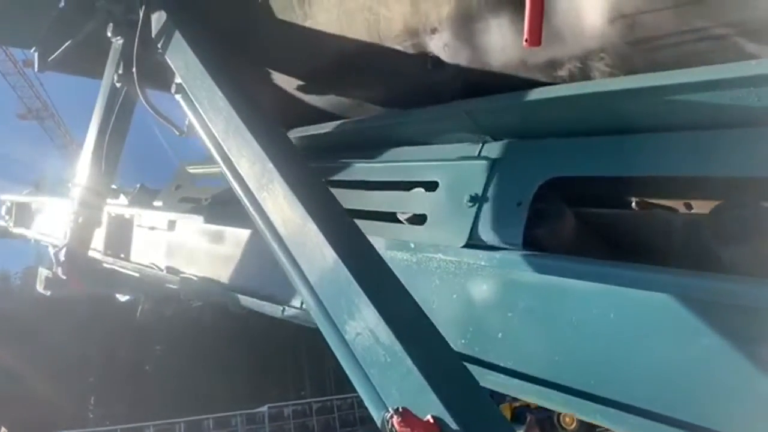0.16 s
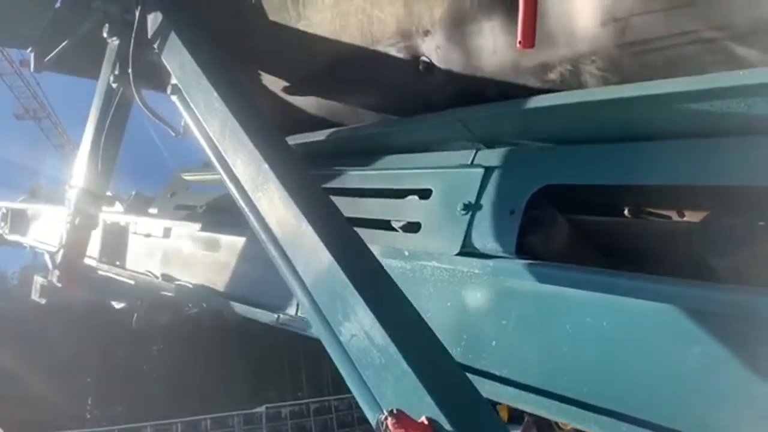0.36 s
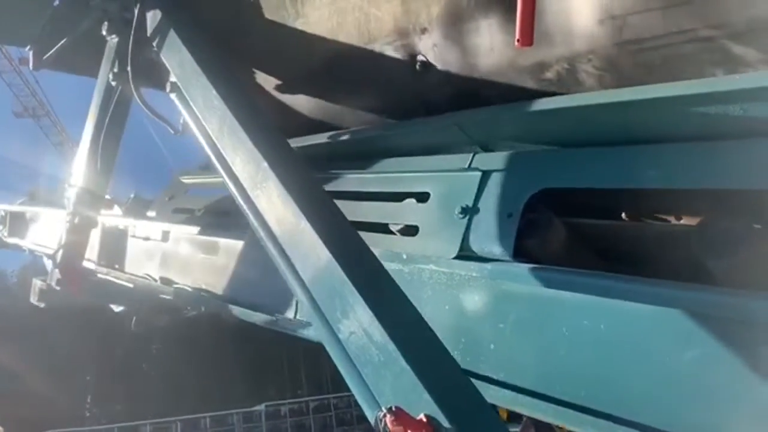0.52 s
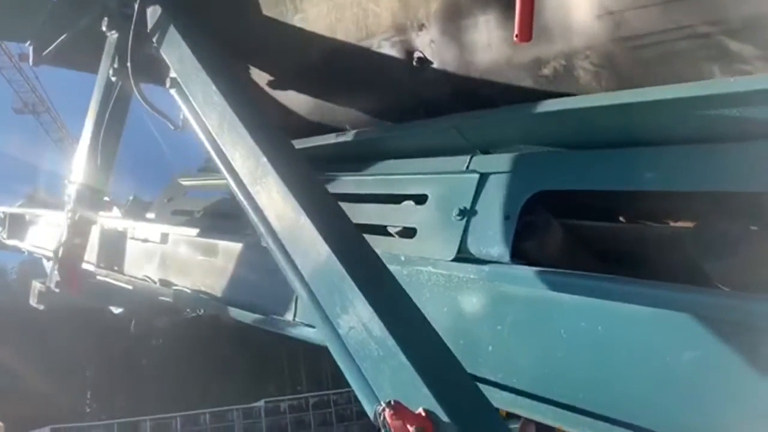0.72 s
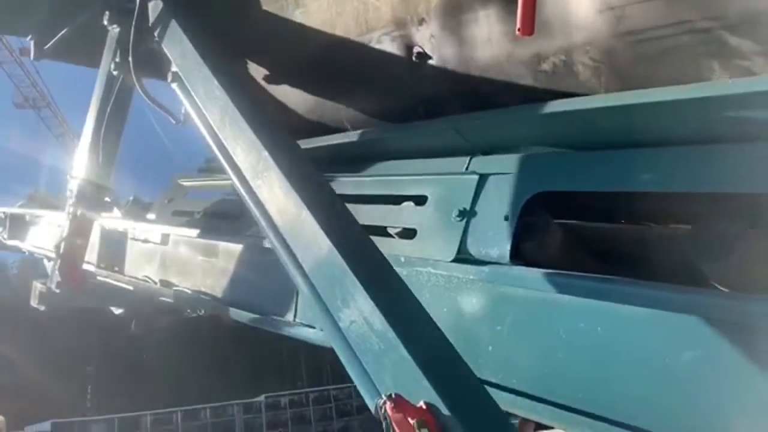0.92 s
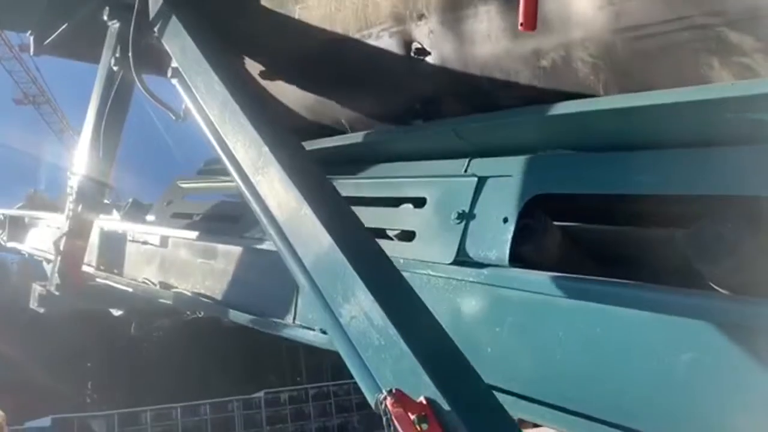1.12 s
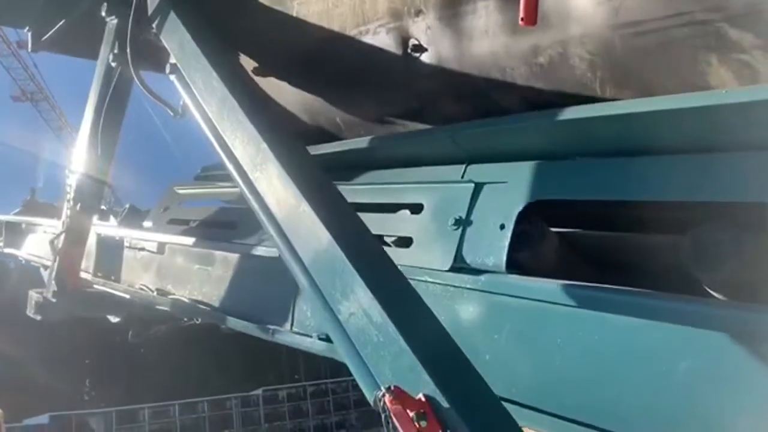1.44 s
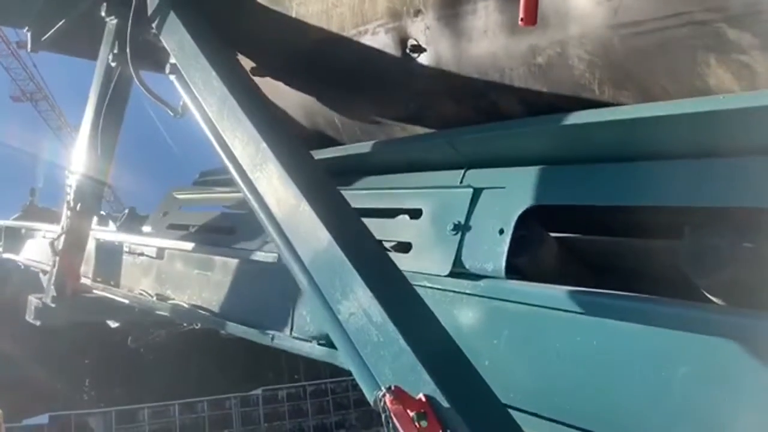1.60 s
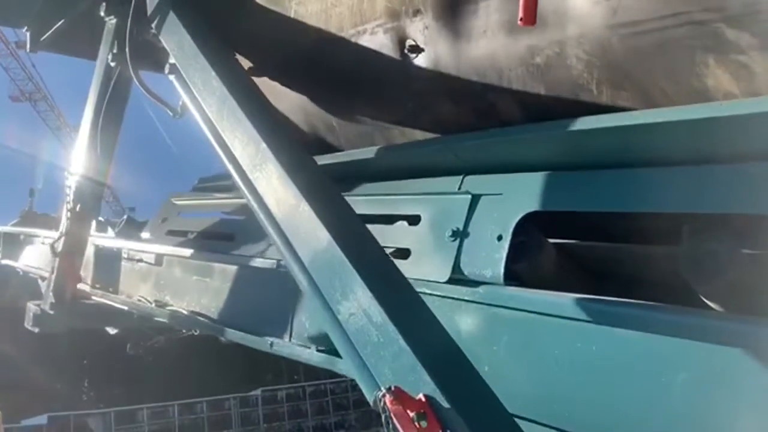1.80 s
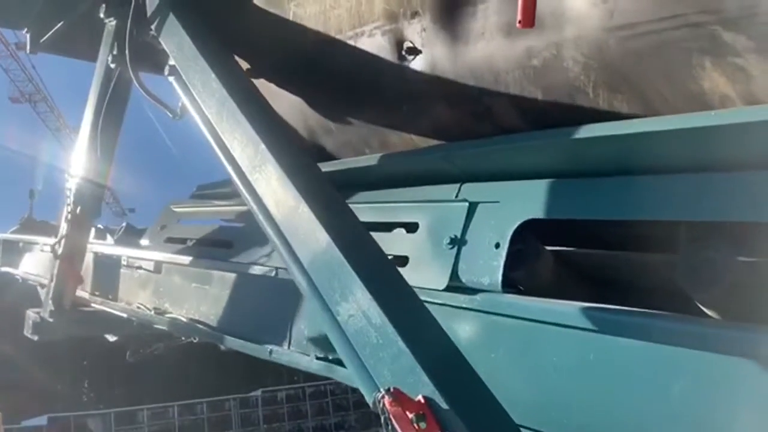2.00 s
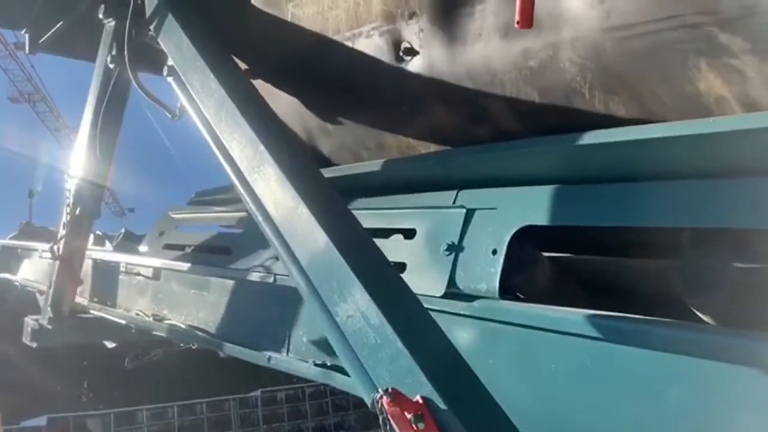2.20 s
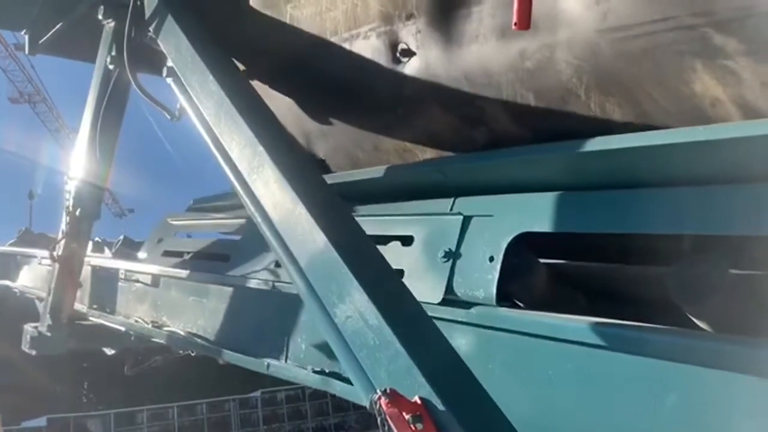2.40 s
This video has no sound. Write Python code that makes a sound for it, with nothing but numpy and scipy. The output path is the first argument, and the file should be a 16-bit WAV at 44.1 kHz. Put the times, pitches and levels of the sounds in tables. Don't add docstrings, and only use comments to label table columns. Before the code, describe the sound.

Large diesel screening machine drones steadily nearby outdoors, stones rattling, with one short bouncing metal clank

```python
import sys
import numpy as np
from scipy import signal
from scipy.io import wavfile
from scipy.ndimage import uniform_filter1d

SR = 44100
rng = np.random.default_rng(int(sys.argv[2]) if len(sys.argv) > 2 else 0)


def pcm_store(signal):
    levels = np.round(np.clip(np.atleast_2d(signal), -1, 1) * 32767)
    wavfile.write(sys.argv[1], SR, levels.astype(np.int16).T)


def convert_level_to_amplitude(level_db):
    exponent = np.asarray(level_db, float) / 20
    return 10 ** exponent


N = 112455
CYCLE_HZ = 19.9012


def evened(x):
    return x / np.sqrt(np.mean(x ** 2) + 1e-20)


def along(curve):
    return np.interp(np.arange(N) / SR, *np.transpose(curve))


def read(points, hz, axis=1):
    rows = np.array(points)
    return np.interp(np.log(hz + 1), np.log(rows[:, 0] + 1), rows[:, axis])


def drift(per_s, count):
    t = np.arange(0, N + 256, 256) / SR
    f = per_s * np.geomspace(.08, 1, 12)[:, None]
    phase = rng.random((count, 12, 1))
    rows = (np.sin(2 * np.pi * (f * t + phase)) / np.sqrt(f)).sum(1)
    return np.array([np.interp(np.arange(N) / SR, t, evened(row)) for row in rows])


def panned(pan_db):
    return convert_level_to_amplitude(np.array([[pan_db / 2], [-pan_db / 2]]))


def add(mix, s, sound):
    part = mix[:, round(s * SR):][:, :sound.shape[1]]
    part += sound[:, :part.shape[1]]


# frequency in Hz, phase the left port leads by in radians.
PORT_PHASE = [(0, 0), (1210, -2.8), (1810, 0), (2300, -2.4), (4650, -6.3), (5400, -9.4), (6600, -12.6),
              (11000, -15.9)]


def lead(hz):
    return np.exp(-1j * np.interp(hz, *np.transpose(PORT_PHASE)))


# order of
# the engine cycle, level in dB rms, left-right difference in dB.
ENGINE_ORDERS = [(2, -46, 0), (3, -44, 0), (4, -19, 0), (5, -45, 0), (6, -51, 3), (7, -49, 2), (8, -27, 1),
                 (9, -41, 4), (10, -33, 2), (11, -43, 4), (12, -43, 1), (14, -44, 0), (16, -47, 3),
                 (19, -45, -2), (20, -38, -7), (21, -47, -12), (22, -48, -14), (23, -41, -4),
                 (24, -40, -7), (25, -42, -4), (26, -43, -4), (27, -46, 6), (28, -47, 1), (30, -43, -4),
                 (35, -49, -5), (37, -48, 1), (39, -50, -10), (40, -46, -7), (43, -48, -12), (44, -44, -2),
                (51, -51, -12), (52, -47, -10), (53, -51, -6), (57, -49, -6), (58, -46, -3), (59, -45, -5),
                (60, -48, 1), (62, -49, -2), (73, -47, -6), (76, -51, 8)]
# time in seconds, level of the whole engine in dB.
ENGINE_LOAD = [(0, 0.5), (.09, -2), (.2, 0.5), (.7, -0.5), (.79, -1.5), (1, 0.5), (1.1, 0.5), (1.65, -.5),
               (1.8, 0.5), (2, 0), (2.15, 0.4), (2.55, 0)]


def engine():
    first_firing_s, pipe_lag_s, left_lag_s = .0026, .0015, .0004
    waver_db, waver_rad, waver_per_s = 2.0, .4, 6
    t = np.arange(N) / SR - first_firing_s
    orders = ENGINE_ORDERS + valves()
    wander = drift(waver_per_s, count=2 * len(orders))
    start = rng.uniform(0, 2 * np.pi, len(orders))
    out = np.zeros((2, N))
    for i, (order, db, pan_db) in enumerate(orders):
        hz = order * CYCLE_HZ
        loose = min(order / 20, 3)
        offset = start[i]
        if order in (4, 8, 10):
            offset = np.pi + 2 * np.pi * (order - 4) * CYCLE_HZ * pipe_lag_s
        lag = np.array([[left_lag_s * min(loose, 1) ** 2], [0]])
        turn = 2 * np.pi * hz * (t - lag) + offset + waver_rad * loose * wander[2 * i]
        level = convert_level_to_amplitude(db + waver_db * loose * wander[2 * i + 1])
        out += np.sqrt(2) * panned(pan_db) * level * np.cos(turn)
    return out * convert_level_to_amplitude(along(ENGINE_LOAD))


def valves():
    order = np.arange(104, 180, 2) + rng.integers(0, 2, 38)
    strength, side = rng.standard_normal((38, 2)).T
    db = -62.5 - 10.5 * np.log2(order / 100) + 3.5 * strength
    return list(zip(order, db, 4 * (1 + side)))


def fuzzy(hz, width, alike):
    r = np.exp(-2 * np.pi * width / SR)
    z = rng.standard_normal((2, N + 8000, 2)) @ [1, 1j]
    z = signal.lfilter([1], np.convolve([1, -r], [1, -r]), z)[:, 8000:]
    shift = lead(hz) if hz < 9000 else .6
    z[1] = alike * z[0] * shift + np.sqrt(1 - alike ** 2) * z[1]
    return evened((z * np.exp(2j * np.pi * hz * np.arange(N) / SR)).real)


# time in seconds, whine level in dB, level of its shaft sideband in dB.
PUMP_LEVELS = [(0, -33, -46), (.05, -29.5, -44), (.3, -28.5, -39), (.55, -32, -38), (.8, -37, -41),
               (.95, -37, -42), (1.12, -35, -40), (1.22, -44, -44), (1.42, -46, -43), (1.55, -39, -38),
               (1.8, -37, -37), (2.1, -36, -38), (2.3, -34, -39), (2.55, -29.5, -38)]
# frequency in Hz, width in Hz, level in dB rms, left-right difference in dB.
GEAR_WHINES = [(1487, 9, -42, 3), (1752, 14, -45, 1), (1611, 4, -50, 3)]
# frequency in Hz,
# width in Hz, level in dB rms, left-right difference in dB.
NARROW_BANDS = [(368, 25, -43.5, -7.5), (737, 20, -47.5, -9.5), (1173, 40, -39.5, -8), (1476, 69, -39, 8),
                (6620, 260, -55.5, 0), (3500, 89, -54.5, 5.5), (12240, 330, -71.5, -2),
                (12800, 200, -79, 2.5), (6040, 30, -58.5, 1)]


def hydraulics():
    pump_hz, shaft_hz, beat_top_s, beat_slip_rad = 1751.4, 16.5, 1.814, .25
    t = np.arange(N) / SR
    s, main_db, side_db = np.transpose(PUMP_LEVELS)
    out = np.zeros((2, N))
    shared = .5 * drift(6.47, count=1)
    port_phase = np.array([[1.4], [0]])
    for hz, db in ((pump_hz, main_db), (pump_hz - shaft_hz, side_db)):
        slip = beat_slip_rad * drift(4.27, count=1)
        turn = 2 * np.pi * hz * (t - beat_top_s) + shared + slip + port_phase
        level = convert_level_to_amplitude(np.interp(t, s, db) + drift(5.08, count=2))
        out += np.sqrt(2) * np.cos(turn) * level * panned(3.5)
    for rows, alike in ((GEAR_WHINES, .94), (NARROW_BANDS, .71)):
        for hz, width, db, pan_db in rows:
            out += convert_level_to_amplitude(db) * panned(pan_db) * fuzzy(hz, width, alike)
    return out


# start in seconds, level in dB, wall pitch in Hz.
HOPPER_LUMPS = [(.055, -29, 365.7), (0.331, -32.5, 364), (.42, -31, 378.5), (0.53, -42, 360),
                (.65, -27, 368), (.834, -35, 363), (.99, -28.5, 380), (1.06, -27, 373.4),
                (1.13, -30.5, 348), (1.26, -31.5, 365), (1.51, -31.5, 372.3), (1.631, -38, 360),
                (1.752, -30.5, 367), (1.839, -31.5, 364.4), (1.971, -34.5, 369), (2.073, -32, 353),
                (2.12, -28.5, 395), (2.195, -24, 368), (2.44, -26.5, 368), (2.51, -30, 385)]


def hopper():
    rise_s, t60_s, split = .022, .33, .98
    out, t = np.zeros((2, N)), np.arange(16000) / SR
    for (s, db, hz), share in zip(HOPPER_LUMPS, rng.random((len(HOPPER_LUMPS), 1))):
        wall = np.exp(2j * np.pi * hz * t) + .5 * share * np.exp(2j * np.pi * split * hz * t)
        shape = (1 - np.exp(-t / rise_s)) * convert_level_to_amplitude(db + 8.5 - 60 * t / t60_s)
        add(out, s, panned(-4) * shape * np.array([wall, wall * lead(hz)]).real)
    return out


# time in seconds, load in dB.
DECK_LOAD = [(0, 0), (.5, 1.5), (1, 0.5), (1.5, 0.5), (2, 0.5), (2.2, 2.5), (2.55, 3)]
# start in seconds, level in dB, pitch in Hz.
STONE_HITS = [(.2224, -42.5, 3800), (.24, -44, 3700), (.27, -47.5, 5000), (.3, -47, 6300),
              (.335, -49, 3750), (.355, -49, 3740), (.3995, -58, 6400), (.4294, -47, 3500),
              (.4574, -51, 3400), (.5062, -47, 3500), (.545, -46, 4220), (.5561, -46, 3900),
              (.6005, -47, 3500), (.7247, -44, 3170), (.745, -52, 3600), (.8724, -51, 3240),
              (.9123, -48, 3500), (.9682, -42, 3410), (.97, -47, 2680), (1.005, -52, 3800),
              (1.064, -49, 3830), (1.1298, -42, 4160), (1.145, -46, 4480), (1.158, -42.5, 3900),
              (1.215, -44, 2820), (1.245, -51, 4700), (1.275, -43, 4080), (1.3059, -43, 4010),
              (1.33, -47, 4240), (1.352, -52, 4200), (1.482, -48, 3500), (1.4995, -52, 4000),
              (1.5474, -51, 4630), (1.715, -50, 6450), (1.765, -46, 6600), (1.8726, -53, 6900),
              (1.8921, -48, 3250), (2.0053, -43, 5000), (2.05, -50, 4150), (2.09, -48, 3670),
              (2.14, -53, 2630), (2.152, -44, 4050), (2.158, -42.5, 6200), (2.24, -47, 7060),
              (2.2635, -46, 3900), (2.39, -49, 4620), (2.4194, -49, 3680), (2.44, -46, 4800),
              (2.46, -43.5, 4900), (2.5062, -46, 3700), (2.53, -48, 4200)]


def stones():
    t60_s, rise_s, pitch_spread = .13, .0046, .2
    rattle_per_s, rattle_db, rattle_size_db, rattle_load = 94, -46, 1.5, 1.5
    out, t = np.zeros((2, N)), np.arange(3000) / SR
    moment, size, pitch, side = rng.random((240, 4)).T
    when = moment * 240 / rattle_per_s
    size_db = rattle_db - rattle_size_db * np.log(size + .05)
    size_db += rattle_load * np.interp(when, *np.transpose(DECK_LOAD))
    rattle = zip(when, size_db, 2000 * 3.6 ** pitch, 8 * side - 3)
    large = [(*row, 3) for row in STONE_HITS]
    for patches, rows in ((20, large), (2, rattle)):
        for s, db, hz, pan_db in rows:
            spread = 1 + pitch_spread * rng.uniform(-1, 1, (2, patches, 1))
            if s < N / SR:
                mesh = np.sin(2 * np.pi * hz * spread * (t + 1)).sum(1)
                shape = np.minimum(t / rise_s, 1) * convert_level_to_amplitude(db - 60 * t / t60_s)
                add(out, s, panned(pan_db) * mesh * shape)
    return out


def ring(modes, t):
    tones = sum(convert_level_to_amplitude(db - 60 * t / t60) * np.sin(2 * np.pi * hz * t) for hz, db, t60 in modes)
    return np.minimum(t / .00092, 1) * tones


# start in seconds, level in dB.
CLANK_BLOWS = [
    (2.1455, 0),
    (2.2074, -1),
    (2.2628, -2),
    (2.3211, -2),
    (2.3675, -5),
]
# frequency in Hz, level in dB, 60 dB decay in seconds.
PLATE_MODES = [(2595, -38, .1), (3680, -41, .2), (4587, -42, .3), (5647, -44, .1), (5916, -39, .14),
               (6740, -45, .08), (1900, -38, .1)]
# frequency in Hz, level in dB, 60 dB decay in seconds.
RAIL_MODES = [(3985, -37, .22), (4560, -47, .2), (5087, -47, .16), (6980, -46, .08), (8225, -52, .35)]


def clank():
    out, t = np.zeros((2, N)), np.arange(16000) / SR
    for i, (s, db) in enumerate(CLANK_BLOWS):
        struck = RAIL_MODES if i else PLATE_MODES
        modes = [(hz, mode_db + db + 3 * rng.uniform(-.52, 1), t60) for hz, mode_db, t60 in struck]
        add(out, s, panned(1) * ring(modes, t))
    return out


# frequency
# in Hz, left level in dB per Hz, right level in dB per Hz.
NOISE_SPECTRUM = [(18, -68, -66), (40, -65.5, -50), (99, -50.5, -56.5), (234, -54, -55.5), (265, -50, -66),
                  (313, -56.5, -57.5),
                  (396, -53, -49.5), (573, -63, -58.5), (640, -65.5, -54), (1130, -60, -57),
                 (1130, -54.5, -58.5),
                  (1710, -63, -59), (1956, -63, -63), (3320, -70, -74), (3700, -69, -76.5), (5070, -77, -76),
                 (6600, -76, -75), (8180, -88, -80.5), (9330, -89, -91.5),
                  (10700, -105.5, -99.5), (11600, -102, -102), (12800, -104, -104), (13300, -120, -120)]
# frequency in Hz, correlation from -1 to 1.
PORT_LIKENESS = [(200, .996), (290, -.4), (350, .55), (3000, .45), (5400, .88), (6100, .4), (6600, .85),
                 (7400, .5)]


def roar():
    patch_db, flicker_db = 1, 1.1
    throb_depth, throb_from_hz, load_from_hz = .038, 4200, 950
    sway_depth, sway_per_s, sway_under_hz = .06, 5, 7000
    frames, hz = N // 512 + 5, np.fft.rfftfreq(2048, 1 / SR)
    a, b, c, d, patches = rng.standard_normal((frames, 1025, 5)).T
    patches = uniform_filter1d(patches, size=24, axis=0)
    patches = evened(uniform_filter1d(patches, size=5, axis=1))

    sway = sway_depth * np.pad(drift(sway_per_s, count=1)[0, ::512], (0, 8), "edge")[:frames]
    phase = np.interp(hz, *np.transpose(PORT_PHASE)) * (hz < sway_under_hz)
    turned = np.exp(-1j * phase[:, None] * sway)
    same = np.clip(read(PORT_LIKENESS, hz), -1, 1)[:, None]
    left = a + 1j * b
    right = same * left * lead(hz)[:, None] * turned + np.sqrt(1 - same ** 2) * (c + 1j * d)
    z = np.array([left, right])

    spectrum = NOISE_SPECTRUM
    level_db = np.array([read(spectrum, hz, axis=side) for side in (1, 2)])[:, :, None]
    load_db = np.interp(np.arange(frames) * 512 / SR, *np.transpose(DECK_LOAD))
    load_share = (1 / (1 + (load_from_hz / (hz + 1)) ** 2))[:, None]
    z *= convert_level_to_amplitude(level_db + patch_db * patches + load_db * load_share) * np.sqrt(SR / 2048)

    high = (1 / (1 + (throb_from_hz / (hz + 1)) ** 4))[:, None]
    body, top = (signal.istft(z * share, nperseg=2048, noverlap=1536)[1][:, :N]
                 for share in (1 - high, high))
    throb = 1 + throb_depth * np.cos(2 * np.pi * 4 * CYCLE_HZ * np.arange(N) / SR)
    return body + top * throb * convert_level_to_amplitude(flicker_db * drift(30.41, count=1))


def scene():
    return engine() + hydraulics() + hopper() + stones() + clank() + roar()


def band_limit(x):
    return signal.sosfilt(signal.butter(12, 13330, fs=SR, output="sos"), x)


def record(dry):
    mix = dry * np.minimum(np.arange(N) / 60, 1)
    return band_limit(mix)


dry = scene()
out = record(dry)
pcm_store(out)
```